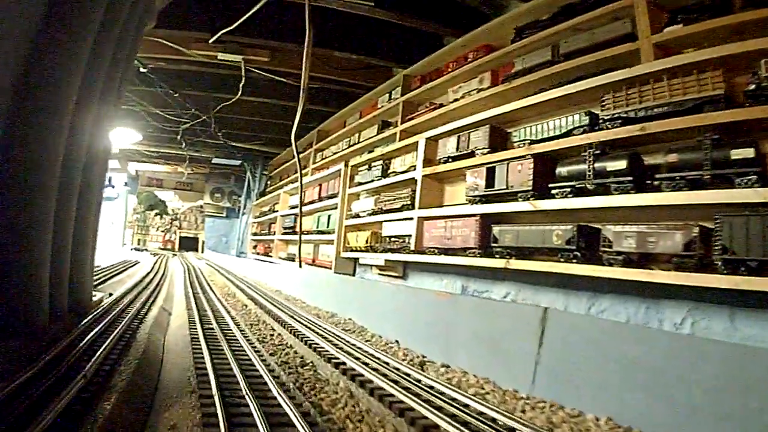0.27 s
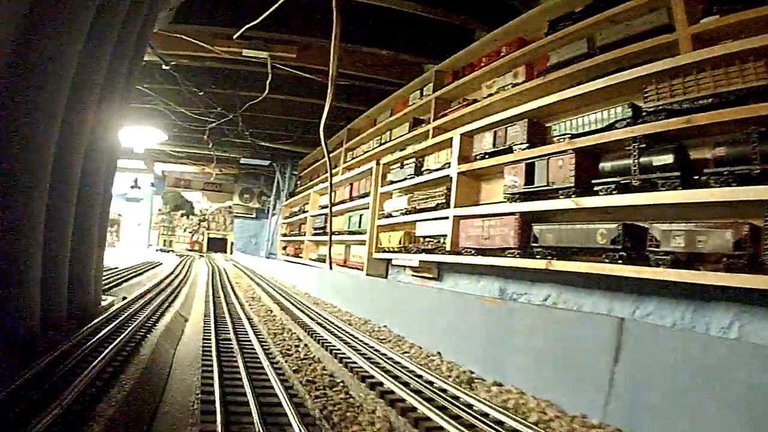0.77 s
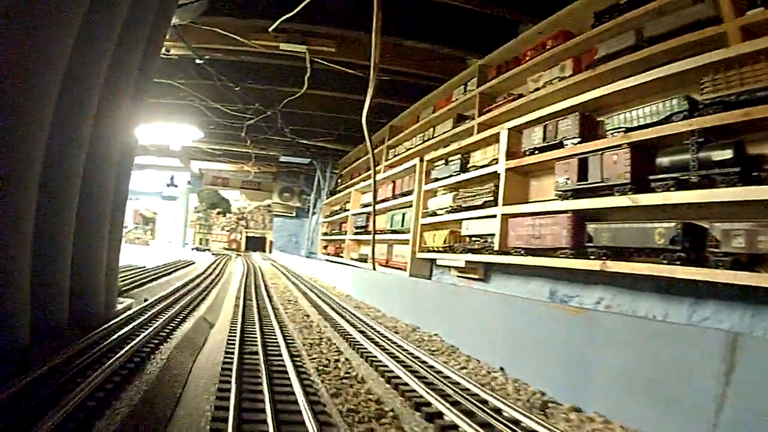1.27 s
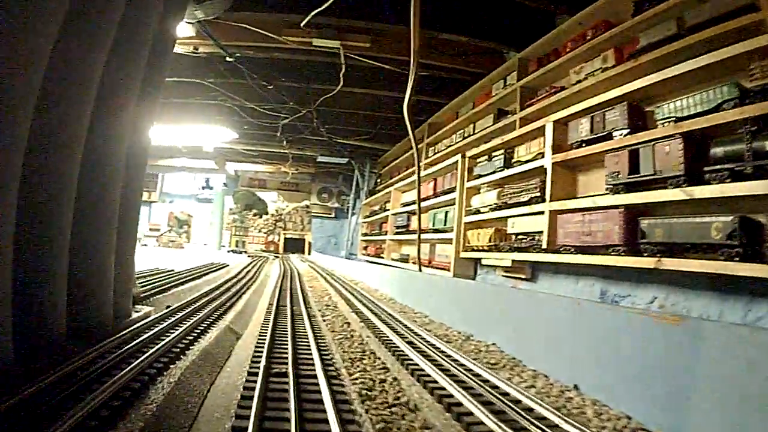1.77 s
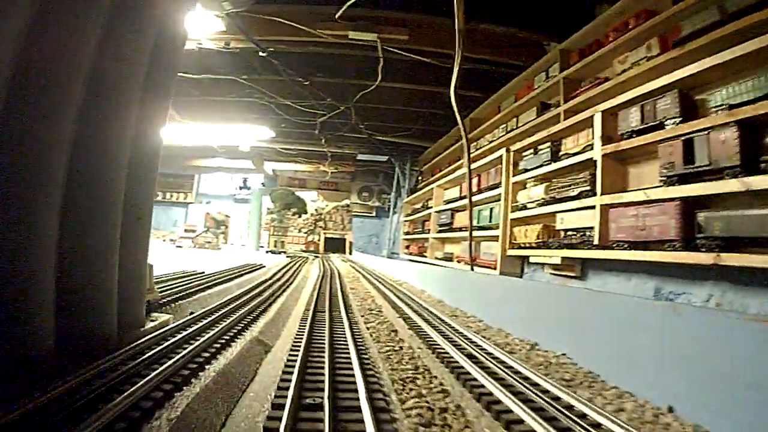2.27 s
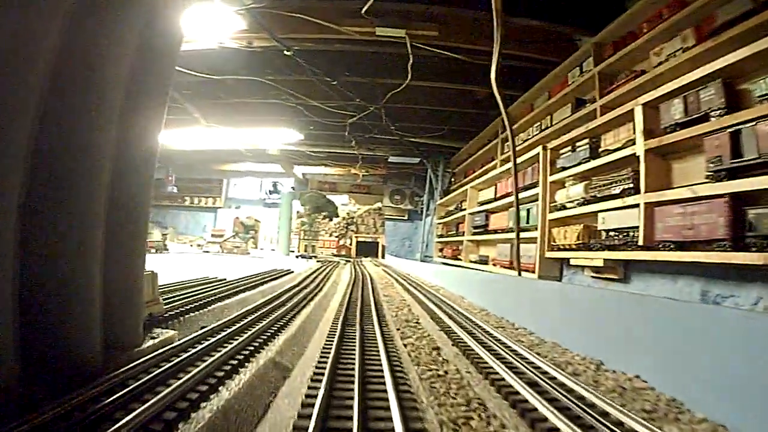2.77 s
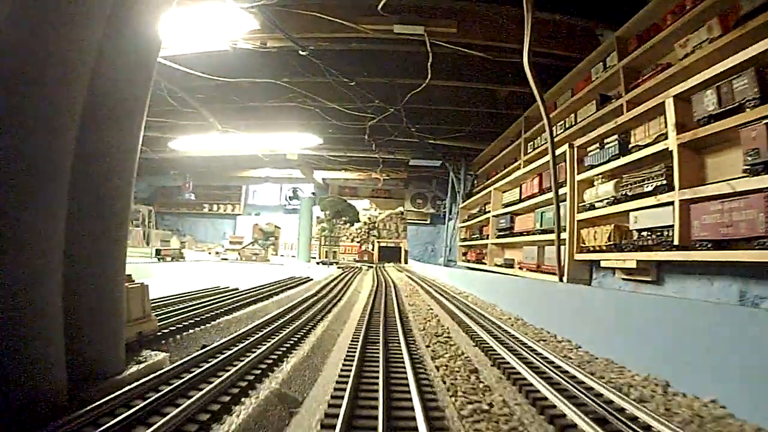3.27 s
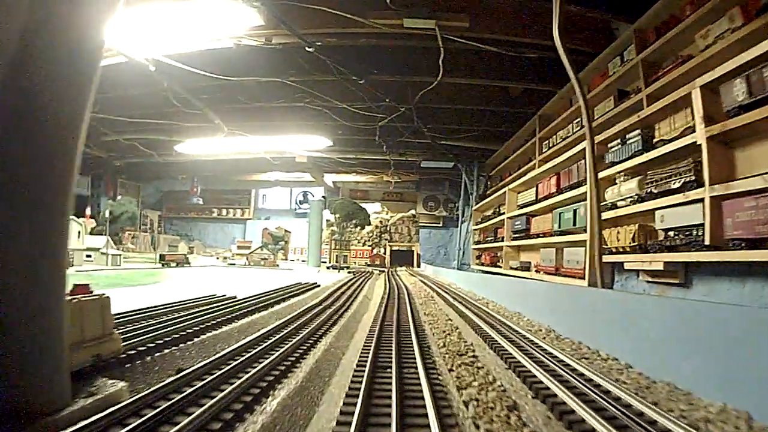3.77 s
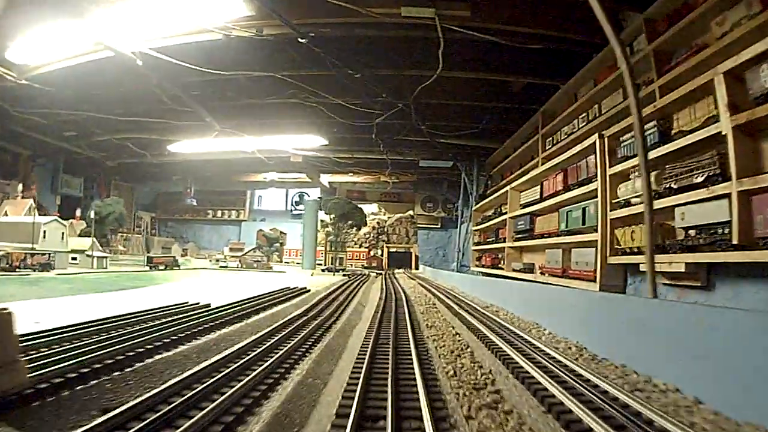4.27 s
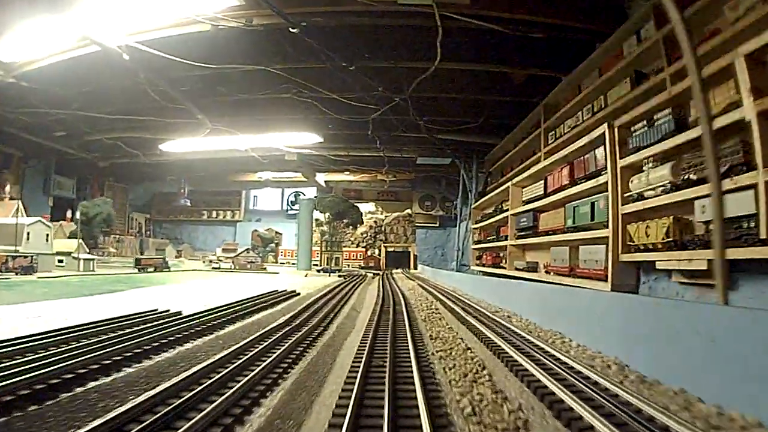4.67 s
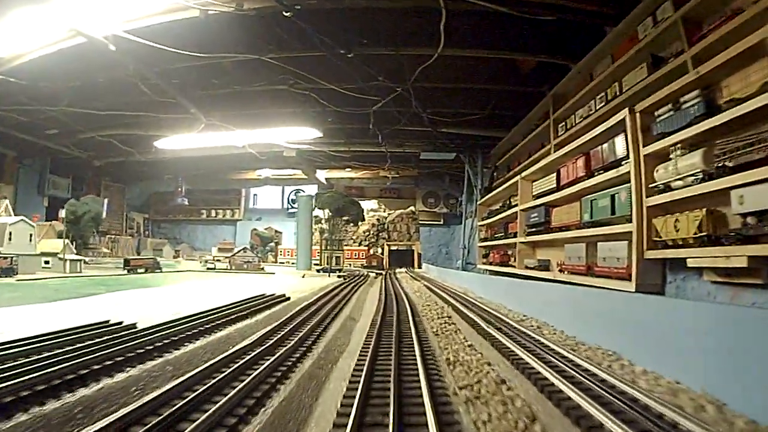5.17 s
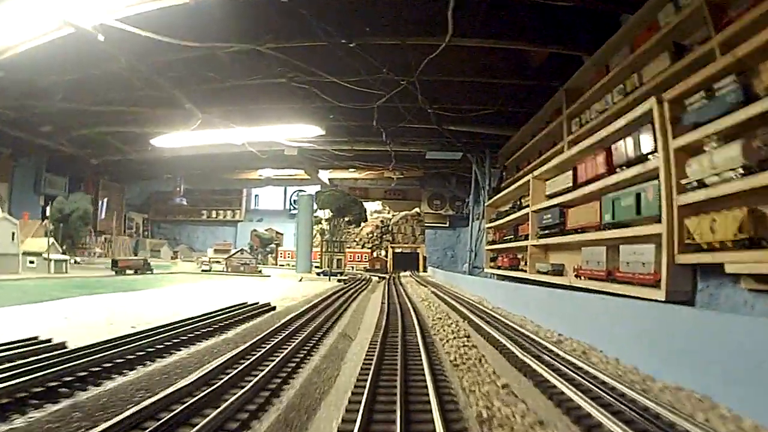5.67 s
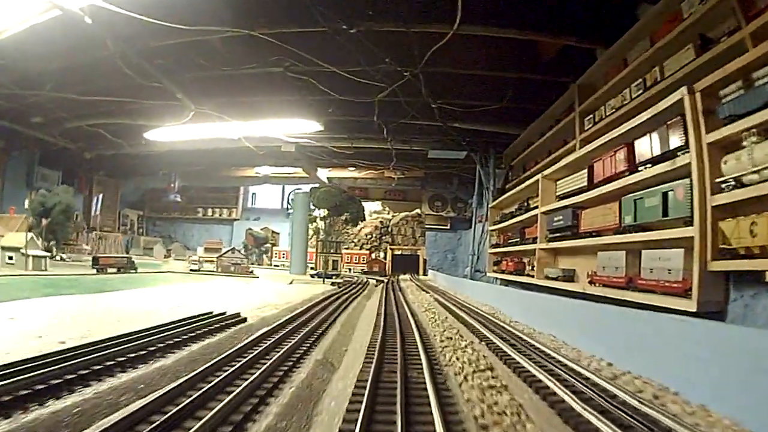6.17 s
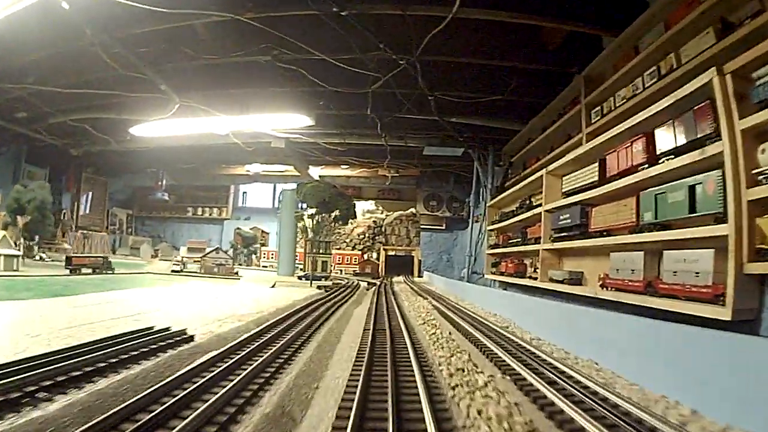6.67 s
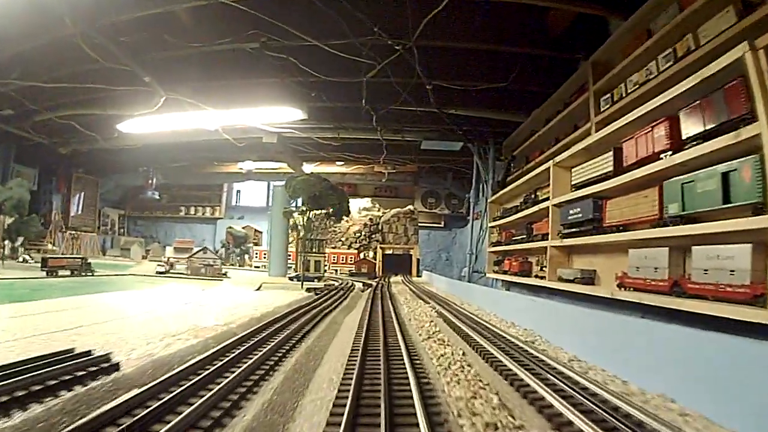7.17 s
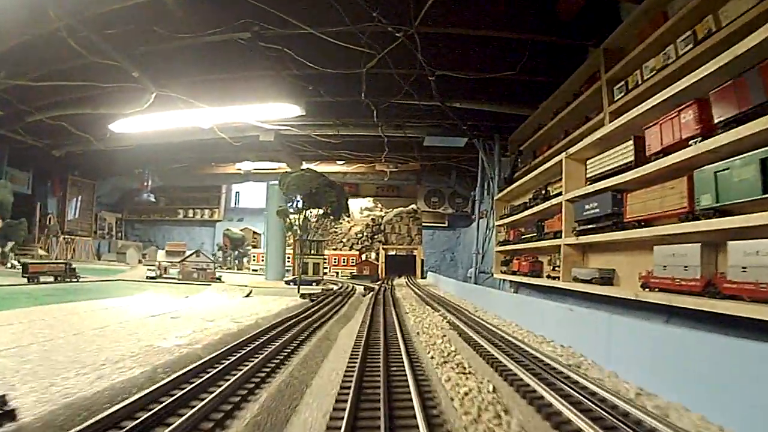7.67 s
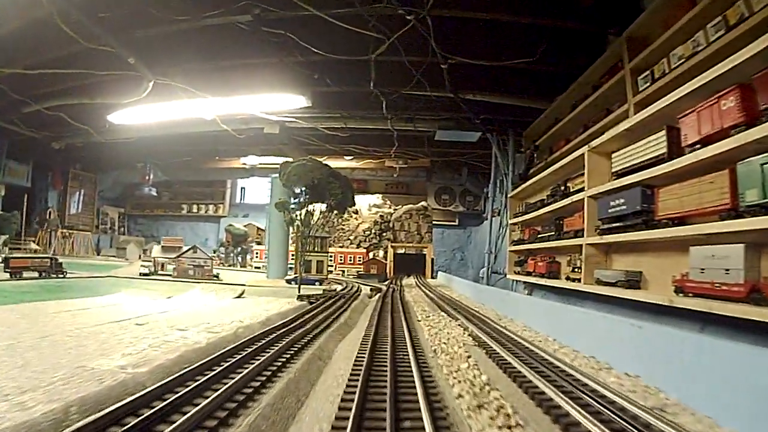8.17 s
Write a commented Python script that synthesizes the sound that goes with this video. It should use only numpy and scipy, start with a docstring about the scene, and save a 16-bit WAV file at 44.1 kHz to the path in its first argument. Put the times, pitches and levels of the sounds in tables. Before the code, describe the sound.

Soft rolling and scattered wheel clicks come from a model locomotive running on metal rails indoors, its motor humming faintly. Near the middle the sound swells into a loud, rough rattle, with dense uneven clacks over a booming, droning chassis, and keeps going. The microphone is mounted on the train, so everything is very close and a little muffled, and the strongest knocks distort slightly.

```python
"""A model locomotive carries a small camera along three-rail track; the sound comes mostly through its body.
At first it rolls quietly: the wheels rumble, roar, chatter and knock over bumps in the rails,
while the chassis (its frame) drones and the motor hums faintly. Halfway the ride turns much louder.
From then on the hardest knocks overload the recorder and crackle."""
import sys
import numpy as np
from scipy import signal
from scipy.fft import rfft, irfft, next_fast_len
from scipy.io import wavfile
from scipy.ndimage import map_coordinates

SR = 44100
rng = np.random.default_rng(int(sys.argv[2]) if len(sys.argv) > 2 else 0)


def output_pcm(signal):
    """Save a mono or channel-first signal as 16-bit PCM at the path in sys.argv[1].

    Samples are clipped to [-1, 1] before scaling.
    """
    pcm = np.clip(np.atleast_2d(signal).T, -1, 1) * 32767
    wavfile.write(sys.argv[1], SR, np.round(pcm).astype(np.int16))


N = 371322
TIME = np.arange(N) / SR

# The loudest wheel knocks: start_s, level_db, pitch_hz, tick_db, thud_db, length_s
# (knocks() raises each of the three levels by a set amount)
WHEEL_KNOCKS = [(0.313, -20.5, 1900, -26.5, -14, 0.0022), (0.448, -19, 1820, -28.5, -9.5, 0.0029),
                (0.517, -21, 1360, -29, -9, 0.0033), (0.596, -16.5, 1730, -27, -11.5, 0.0036),
                (0.771, -15, 1890, -30, -9.5, 0.0031), (0.815, -17, 1630, -23, -11, 0.008),
                (1.208, -11.5, 1830, -10.5, -14, 0.0034), (1.287, -16, 1440, -35, -4, 0.0087),
                (1.455, -20, 1810, -14.5, -18.5, 0.0034), (1.525, -19.5, 2050, -22.5, -22, 0.0058),
                (1.556, -13.5, 1800, -38.5, -26.5, 0.0048), (1.724, -15.5, 1550, -25.5, -26, 0.0057),
                (1.747, -13.6, 1860, -17, -25.5, 0.0041), (1.974, -19.5, 1940, -20.5, -16, 0.0035),
                (2.011, -18, 1580, -22, -18, 0.003), (2.038, -14, 1380, -22.5, -9, 0.0065),
                (2.051, -21.5, 1910, -27, -20, 0.003), (2.089, -20.5, 1340, -26, -16, 0.003),
                (2.115, -18.5, 1500, -14, -10, 0.0022), (2.223, -21, 1610, -12, -16, 0.0069),
                (2.297, -17, 1440, -29.5, -25, 0.0026), (2.377, -17.5, 1800, -20.5, -14.5, 0.0032),
                (2.468, -12, 1340, -38, -10.5, 0.0022), (2.619, -11.5, 1850, -22.5, -17, 0.003),
                (2.676, -16, 1850, -27, -18, 0.005), (2.708, -13.5, 2070, -27, -14, 0.0029),
                (2.718, -19, 2000, -25, -11, 0.004), (2.916, -16.5, 1900, -28, -10, 0.0034),
                (2.928, -15, 2230, -36, -16, 0.0068), (3.043, -14, 1180, -31, -5, 0.0035),
                (3.107, -16.5, 1610, -6, -5, 0.0025), (3.144, -13.5, 1650, -12, -5, 0.0055),
                (3.18, -17, 1860, -29, -9, 0.0024), (3.303, -15.5, 1260, -26.5, -0.5, 0.0043),
                (3.341, -12.5, 1300, -30, -13.5, 0.0013), (3.415, -13, 2030, -24, -8.5, 0.0068),
                (3.522, -12, 2180, -35.5, -7, 0.0048), (3.602, -14, 1900, -25, -8, 0.003),
                (3.656, -12, 2100, -27, -11.5, 0.0036), (3.754, -12, 2110, -19, -6.5, 0.0075),
                (3.9, -4.5, 2145, -9.5, -12, 0.0057), (3.94, -10, 1900, -26, -8, 0.0035),
                (4.22, -5, 1940, -27, -8.5, 0.0019), (4.238, -6, 1920, -23, -13.5, 0.0027),
                (4.259, -3.5, 1910, -27, -6, 0.0019), (4.064, -5, 1810, -13, -6, 0.0041),
                (4.129, -5, 1700, -34, 1, 0.002), (4.249, -5, 1400, -32, -13, 0.0035),
                (4.293, -3.5, 2150, -36, -14.5, 0.0063), (4.447, -3.5, 1940, -24, -11, 0.0026),
                (4.477, -3, 1240, -31, -12.5, 0.0052), (4.519, -3.5, 2080, -28, -13, 0.0026),
                (4.672, -5.5, 1490, -26.5, -12, 0.0043), (4.865, -5, 1500, -25, -4, 0.003),
                (4.91, -4.5, 1890, -24, -10.5, 0.0026), (4.916, -2.5, 1910, -19, -10.5, 0.0034),
                (4.975, -6.5, 1880, -23, -8.5, 0.0033), (5.193, -3.6, 1830, -24, 0.5, 0.0049),
                (5.218, -5.5, 1940, -24.5, -16, 0.0023), (5.339, -0.4, 2170, -21, -21, 0.0071),
                (5.359, -3, 1810, -25, -5, 0.0033), (5.405, -3, 1953, -28, -12.5, 0.0029),
                (5.509, -3.5, 1910, -37, -12, 0.0028), (5.524, -2.5, 1810, -21, -8, 0.0042),
                (5.544, -2.5, 1930, -20, -16, 0.0032), (5.554, -8, 1900, -26, -5.5, 0.0034),
                (5.637, -3, 1850, -21, -7.5, 0.0031), (5.689, -1, 1870, -24, -4, 0.0016),
                (5.748, -1.5, 1993, -19, -15.5, 0.0032), (5.768, -3, 1880, -19, -18.5, 0.0022),
                (5.796, -2.5, 1930, -36.5, -14, 0.0024), (5.805, -3, 1860, -23, -16, 0.0022),
                (5.841, -4.4, 1900, -25, -6.5, 0.003), (5.892, -4.5, 1890, -25, -11, 0.0034),
                (5.87, -3.5, 1920, -22, -6, 0.0031), (5.93, -4, 1734, -26, -16, 0.003),
                (5.966, -3.5, 1910, -19, -17, 0.0033), (5.976, -1, 2010, -31.5, -12.5, 0.0016),
                (6.062, -2.5, 1940, -15, -15, 0.0016), (6.16, -3, 1900, -20, -12, 0.0076),
                (6.213, -1.5, 1930, -13, -15.5, 0.0039), (6.257, -3, 1940, -16, -10, 0.0033),
                (6.316, -3.5, 1910, -24, -12, 0.0045), (6.345, -2.5, 1930, -20.5, -11.5, 0.004),
                (6.357, 1, 1970, -19.5, -7, 0.0026), (6.369, 0.5, 1710, -22, -7, 0.0042),
                (6.393, -2.5, 1960, -36, -10, 0.0047), (6.405, -2.5, 1950, -27, -10, 0.0049),
                (6.453, -4, 1930, -25, -8, 0.0019), (6.53, -2.5, 1906, -18.5, -15, 0.0034),
                (6.539, -4.5, 1900, -25, -9.5, 0.003), (6.552, -2, 2000, -30, -9, 0.005),
                (6.582, -3, 1860, -22, -6, 0.0045), (6.605, -3.5, 1900, -25, -14, 0.003),
                (6.615, -2.5, 1885, -21.5, -20, 0.0035), (6.653, -2, 2037, -21.5, -14, 0.004),
                (6.744, -3, 1857, -18.5, -13, 0.0048), (6.774, -2.3, 1890, -27, -11, 0.0031),
                (6.79, -2.5, 1960, -16, -16, 0.0048), (6.821, -3, 1810, -21, -16.5, 0.0036),
                (6.853, -3, 1890, -13, -18, 0.0021), (6.891, -4, 1950, -19, -14.5, 0.0069),
                (6.912, -3, 1940, -24.5, -9, 0.0023), (6.922, -3, 1830, -24.5, -9.5, 0.0054),
                (6.933, -4, 1840, -23.5, -15, 0.0032), (7.338, -3, 1800, -33.5, -10.5, 0.0036),
                (7.365, -2.6, 1870, -33, -6, 0.0029), (7.386, -3.5, 1870, -26, -15, 0.0015),
                (7.403, -4, 1900, -24.5, -8.5, 0.0026), (7.506, -4.5, 1880, -25, -7.5, 0.0026),
                (8.001, -2.5, 1887, -17.5, -15.5, 0.0052), (8.039, -3, 1900, -26, -7.5, 0.0026),
                (8.048, -3, 1900, -17, -6, 0.0019), (8.12, -3.5, 1880, -25, -11.5, 0.0021),
                (8.222, -3, 1900, -22.5, -10.5, 0.003), (8.269, -3, 1900, -34.5, -7.5, 0.0036),
                (8.393, -2.5, 1950, -19.5, -19, 0.0019)]
# Pitches at which the outer shell rings: pitch_hz, width_hz, boost_db
SHELL_RINGS = [(1444.5, 38, 7.5), (1470, 24, -0.2), (1740, 120, -0.5), (2176, 180, 6), (2252, 31, 6),
               (3100, 120, 4)]


def ride_db():
    """How hard the rails shake the wheels at each moment, in dB; 0 is full ride."""
    shaking = [(0, -32.5), (1.2, -32), (2.3, -31), (2.65, -28.5), (3.0, -29.5), (3.55, -28), (3.85, -23),
               (4.25, -16.5), (4.5, -14.5), (4.8, -16.5), (5.1, -16), (5.4, -13.5), (6.3, -12.5),
               (6.85, -12), (7.2, -14), (7.8, -14.5), (8.05, -12.5), (8.42, -14.5)]   # strength of the shaking: time_s, level_db
    full_ride_db = -14
    return curve(shaking, TIME) - full_ride_db


def ride_gain(full_db, follows):
    """A layer's gain: full_db at full ride, moving by `follows` dB for each dB of the ride."""
    return from_db(full_db + follows * ride_db())


def wheel_force(per_s, spread_db, smooth):
    """Force at the wheels: tiny impacts of uneven size over the steady noise of smooth rolling."""
    sizes = from_db(spread_db * np.minimum(rng.exponential(1, N), 4)) * rng.choice([-1, 1], N)
    impacts = rms_one(sizes * (rng.random(N) < per_s / SR))
    return impacts + smooth * rng.standard_normal(N)


def shell_chatter():
    """Fine impacts, under a fluttering load, make the shell roar and chatter."""
    roar_tone = [(500, -36), (750, -18), (900, 2), (1050, 2), (1300, 2), (1600, 2), (1800, -9),
                 (2400, -23.5), (3600, -25)]   # the mid-pitched roar: pitch_hz, level_db
    chatter_tone = [(600, -36), (1200, -28.5), (1650, -15.5), (1880, 4.5), (2050, 1), (2310, -0.5),
                    (2400, -11), (2800, -10), (3080, -13.5), (3200, -19), (3700, -9.5), (4100, -33)]   # the brighter chatter: pitch_hz, level_db
    force = wheel_force(per_s=1200, spread_db=2, smooth=0.8)
    force *= from_db(1.1 * drift(per_s=45) + 0.78 * drift(per_s=16))   # fast flutter, slower sway
    roar = ride_gain(full_db=-17, follows=0.98) * body(force, roar_tone, SHELL_RINGS)
    chatter = ride_gain(full_db=-14.5, follows=1.05) * body(force, chatter_tone, SHELL_RINGS)
    return roar + chatter


def knocks(rows):
    """Each knock rings the shell, with a clack, tick and thud. Returns the sound and wheel lift (0-1)."""
    clack_tone = [(400, -36), (900, -9), (1350, 0), (1900, -7.5), (2280, 2.5), (2430, -11), (3000, -15.5),
                  (3800, -19)]   # the shell's clack: pitch_hz, level_db
    thud_tone = [(60, -4.5), (110, -12.5), (180, -12), (250, 6), (310, -8), (390, 0.5), (550, -15.5),
                 (900, -13), (1400, -36)]   # the chassis's thud: pitch_hz, level_db
    tick_tone = [(1500, -23), (2500, -3), (2900, -1), (3300, -11.5), (3700, -2.5)]   # the tick where wheel meets rail: pitch_hz, level_db
    clack = from_db(2.5) * body(rng.standard_normal(N), clack_tone, SHELL_RINGS)
    thud = body(rng.standard_normal(N), thud_tone)
    tick = body(rng.standard_normal(N), tick_tone)
    knock_boost_db, tick_boost_db, thud_boost_db = 3, 12, 9
    squash = 1.07   # several swings reach nearly the same height, so the knock sounds denser
    sound, lift = np.zeros(N), np.zeros(N)
    for (start_s, level_db, pitch_hz, tick_db, thud_db, length_s), phase in zip(rows, rng.random(len(rows))):
        span = slice(int(start_s * SR), int(start_s * SR) + SR // 40)
        since_s = np.maximum(TIME[span] - start_s, 0)
        age = since_s / (0.73 * length_s)   # the knock is strongest at age 1
        swell = (age * np.exp((1 - age ** 2) / 2)) ** 0.8   # power below 1: sharper start, longer tail
        ring = np.sqrt(2) * np.sin(2 * np.pi * (pitch_hz * since_s + phase))
        blow = rms_one(swell * (ring + clack[span] + from_db(tick_db + tick_boost_db) * tick[span]))
        blow += from_db(thud_db + thud_boost_db) * rms_one(swell * thud[span])
        blow = np.tanh(squash * blow / np.abs(blow).max()) / np.tanh(squash)
        sound[span] += from_db(level_db + knock_boost_db) * blow
        lift[span] = np.maximum(lift[span], swell)
    return sound, lift


def rebounds():
    """After a hard knock the wheel drops back on the rail a little more lightly; rows for knocks()."""
    hard_db, loss_db, rebound_s = -3, 2.4, 0.002
    waits_s = 0.0022 * (1 + rng.random(len(WHEEL_KNOCKS)))
    return [(start_s + length_s + wait_s, db - loss_db, hz, tick_db, thud_db, rebound_s)
            for (start_s, db, hz, tick_db, thud_db, length_s), wait_s in zip(WHEEL_KNOCKS, waits_s)
            if db > hard_db]


def rattles():
    """Light knocks at random moments and pitches, louder as the ride gets rougher; rows for knocks()."""
    per_s, tick_db, thud_db, length_s = 13, -21.5, -6, 0.0025
    levels_db = -11 + 0.54 * ride_db()
    pitches_hz = rng.uniform(1090, 2260, N)
    hits = (rng.random(N) < per_s / SR) & (TIME < TIME[-1] - length_s)
    return [(TIME[i], levels_db[i], pitches_hz[i], tick_db, thud_db, length_s) for i in np.flatnonzero(hits)]


def chassis_drone(force):
    """Rough rails shake the chassis into a low drone and a growl above it."""
    drone_tone = [(40, -23), (68, -1), (100, -4), (150, -2.5), (195, 0), (280, -0.5), (330, -2.5),
                  (450, -4), (520, -9.5), (640, -19.5), (1200, -45.5)]   # the low drone: pitch_hz, level_db
    drone_rings = [(79.5, 32, 7), (138, 40, -2.5), (325, 38, -6), (358, 18, 1)]   # the chassis's peaks and dips: pitch_hz, width_hz, boost_db
    growl_tone = [(350, -29), (480, -16.5), (600, 4.5), (760, 7), (900, 1), (1100, -8.5), (1600, -46)]   # the growl: pitch_hz, level_db
    drone = ride_gain(full_db=-17, follows=0.72) * body(force, drone_tone, drone_rings)
    growl = ride_gain(full_db=-23, follows=0.83) * body(force, growl_tone)
    return drone + growl


def chassis_boom():
    """The chassis rings at two pitches, which shift in level and pitch with the load."""
    low_levels = [(0, -32.5), (0.95, -37.5), (1.2, -30), (1.5, -35), (2.4, -30), (2.7, -25.5), (3.0, -30),
                  (3.6, -25), (4.05, -16.5), (4.4, -24), (5.05, -20.5), (5.5, -17.5), (5.95, -19),
                  (6.65, -17.5), (7.05, -19), (7.4, -16.5), (7.9, -21), (8.42, -16.5)]   # the main, lower ring: time_s, level_db
    low_pitches = [(0, 225), (1.1, 217.7), (2.3, 241.5), (2.753, 215.3), (3.6, 236.7), (4.05, 262.7),
                   (4.5, 255), (5.15, 226.5), (5.55, 251.5), (6, 248), (6.6, 261.7), (6.998, 246.7),
                   (7.402, 255), (8, 236.6), (8.42, 260)]   # its pitch: time_s, pitch_hz
    high_levels = [(0, -38), (0.6, -40), (1.12, -31), (1.45, -42.5), (1.9, -37), (2.05, -30.5),
                   (2.5, -30.5), (2.8, -36.5), (3.3, -35), (3.6, -22), (4.3, -28), (4.65, -16),
                   (5.2, -18.5), (5.7, -19.5), (6.2, -21.5), (6.7, -21.5), (7.4, -17.5), (8.42, -19)]   # the upper ring: time_s, level_db
    high_pitches = [(0, 439), (0.75, 428.5), (1.12, 393.4), (2.5, 394.3), (3.6, 390), (4.649, 382.7),
                    (5.2, 374), (5.7, 388), (6.4, 391.2), (8.42, 390)]   # its pitch: time_s, pitch_hz
    low_trim_db, high_trim_db = -1.66, -3.5
    low = from_db(curve(low_levels, TIME)) * ringing(curve(low_pitches, TIME), width_hz=32.8)
    high = from_db(curve(high_levels, TIME)) * ringing(curve(high_pitches, TIME), width_hz=25)
    return from_db(low_trim_db) * low + from_db(high_trim_db) * high


def track_rumble(force):
    """Rough rails shake the track bed into a deep rumble that swells now and then."""
    rumble_tone = [(8, -24.5), (18, -19), (30, -18.5), (50, 4), (64, -4.5), (85, -9.5), (130, -9),
                   (200, -7.5), (300, -19), (500, -63)]   # the deep rumble: pitch_hz, level_db
    bed_rings = [(55.4, 6.1, 1.5), (176, 40, 10.5)]   # where the track bed rings: pitch_hz, width_hz, boost_db
    swells = [(2.93, 2), (3.42, 3), (3.95, 3.5), (5.22, 6), (6.7, 7), (7.55, 4), (8.1, 3), (8.38, 7)]   # moments of stronger rumble: time_s, boost_db
    swell_db = sum(db * hump(time_s, half_length_s=0.21) for time_s, db in swells)
    return ride_gain(full_db=-26, follows=0.25) * from_db(swell_db) * body(force, rumble_tone, bed_rings)


def soft_bumps():
    """A soft bump swings the track bed or chassis: a low tone that swells and fades."""
    bumps = [(1.419, -19, 55.7, 0.019), (1.725, -27, 47.7, 0.071), (2.58, -18.5, 170, 0.024),
             (2.8, -20, 222.7, 0.064), (6.371, -19, 442, 0.04)]   # one row per bump: time_s, level_db, pitch_hz, half_length_s
    return sum(from_db(db) * hump(time_s, half_s) * np.sin(2 * np.pi * hz * (TIME - time_s))
               for time_s, db, hz, half_s in bumps)


def joint_snaps():
    """Sharp rail joints each give a thin, bright snap."""
    snaps = [(0.773, -56), (0.78, -59), (1.212, -39), (1.221, -53.5)]   # one row per snap: start_s, level_db
    snap_tone = [(3000, 3.5), (4300, 8), (5500, -12.5), (9000, -35)]   # the snap's hiss: pitch_hz, level_db
    decay_s = 0.0025
    hiss, sound = body(rng.standard_normal(N), snap_tone), np.zeros(N)
    for start_s, level_db in snaps:
        burst = hiss * (TIME >= start_s) * np.exp(-np.abs(TIME - start_s) / decay_s)
        sound += from_db(level_db) * burst / np.abs(burst).max()
    return sound


def motor():
    """The motor's iron hums at twice the mains rate, wavering a little; its gears sing faintly."""
    hum_hz, hum_db, gear_hz, gear_db = 116.9, -45.5, 603.7, -45
    hum = from_db(hum_db + 1.1 * drift(per_s=11)) * np.sqrt(2) * np.sin(2 * np.pi * hum_hz * TIME)
    return hum + from_db(gear_db) * ringing(np.full(N, gear_hz), width_hz=14)


def body(force, tone, rings=()):
    """Shake a solid part that has a broad tone and rings at certain pitches; the result has power 1."""
    size = 2 * next_fast_len(N // 2 + SR // 4)
    hz = np.maximum(np.arange(size // 2 + 1) * SR / size, 1)
    tone_hz, tone_db = np.transpose(tone)
    db = np.interp(np.log(hz), np.log(tone_hz), tone_db)
    db -= 30 * np.log2(np.maximum(hz / tone_hz[-1], 1))   # fade per octave above the table
    db -= 15 * np.log2(np.maximum(tone_hz[0] / hz, 1))   # and below it
    for pitch_hz, width_hz, boost_db in rings:
        db += boost_db / (1 + (2 * (hz - pitch_hz) / width_hz) ** 2)
    # a minimum-phase filter: the part rings only after it is pushed, never before
    cepstrum = irfft(np.log(from_db(db)))
    cepstrum[1:size // 2] *= 2
    cepstrum[size // 2 + 1:] = 0
    return rms_one(irfft(rfft(force, size) * np.exp(rfft(cepstrum)))[:N])


def ringing(pitch_hz, width_hz):
    """Noise narrowed to a ring around a pitch that may move; the result has power 1."""
    turn = np.exp(2j * np.pi * np.cumsum(pitch_hz) / SR)
    decay = np.exp(-np.pi * width_hz / SR)
    swing = signal.lfilter([1], [1, -2 * decay, decay ** 2], rng.standard_normal(N) / turn)
    strength = np.abs(swing) / np.abs(swing).mean()
    return rms_one((turn * swing).real / (strength + 0.1) ** 0.19)   # partly evened out toward a tone


def drift(per_s):
    """A random wander of power 1 that changes course about per_s times a second."""
    points = rng.standard_normal(N // 20)
    return rms_one(np.interp(TIME * per_s, np.arange(len(points)), points))


def hump(time_s, half_length_s):
    """A smooth rise and fall that reaches 1 at time_s."""
    return np.exp(-((TIME - time_s) / half_length_s) ** 2)


def curve(rows, times_s):
    """Join rows of (time_s, value) with straight lines."""
    return np.interp(times_s, *np.transpose(rows))


def from_db(db):
    """Turn decibels into a gain."""
    return 10 ** (np.asarray(db) / 20)


def rms_one(x):
    """Scale a signal to an average power of 1."""
    return x / np.sqrt(np.mean(x ** 2) + 1e-20)


def scene():
    """The rolling dips during each knock and is rougher just after; the left side hears it all later."""
    blows, lift = knocks(list(WHEEL_KNOCKS) + rebounds() + rattles())
    force = wheel_force(per_s=1200, spread_db=3, smooth=1.25)
    roll = shell_chatter() + chassis_drone(force) + chassis_boom()
    roll += track_rumble(force) + soft_bumps() + motor()
    settle_s, roll_limit, edge_hz = 0.089, 0.85, 3726
    settle = np.exp(-1 / (settle_s * SR))
    roll *= 1 + 0.25 * signal.lfilter([1 - settle], [1, -settle], lift)   # harder rolling after a knock
    roll /= (1 + (roll / roll_limit) ** 4) ** (1 / 4)   # peaks rounded off, so only hard knocks crackle
    train = roll * (1 - 0.82 * lift) + blows   # a wheel in the air loses most of its rolling sound
    # above about 3.7 kHz the sound falls away steeply; only a few thin, bright snaps reach higher
    train = signal.sosfiltfilt(signal.butter(28, edge_hz, fs=SR, output="sos"), train) + joint_snaps()
    lag_s = 0.00013 * (1 + 0.022 * drift(per_s=90))   # shifts as sound comes from one wheel or another
    left = map_coordinates(train, [np.arange(N) - lag_s * SR], order=3, mode="nearest")
    return np.array([left, train])


def record(dry):
    """The recorder rounds loud peaks and cuts them at full scale, which makes nearly all the high treble."""
    clean_limit, rounding_room, cutoff_hz = 0.84, 0.18, 16000
    clean = np.clip(dry, -clean_limit, clean_limit)
    clipped = np.clip(clean + rounding_room * np.tanh((dry - clean) / rounding_room), -1, 1)
    return signal.sosfilt(signal.ellip(10, .05, 70, cutoff_hz, fs=SR, output="sos"), clipped)


dry = scene()
out = record(dry)
output_pcm(out)
```